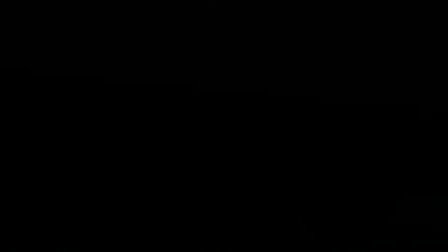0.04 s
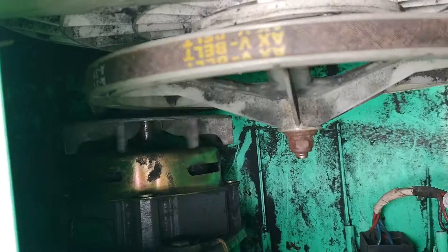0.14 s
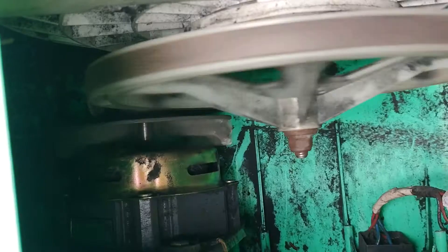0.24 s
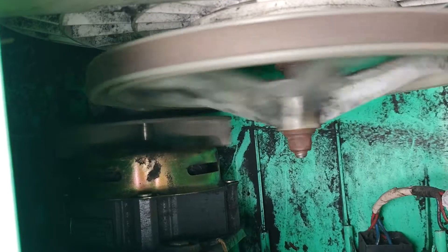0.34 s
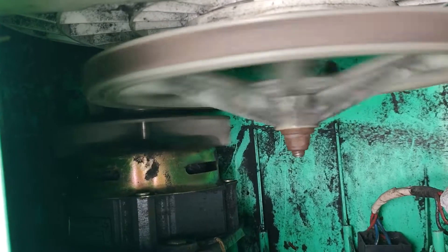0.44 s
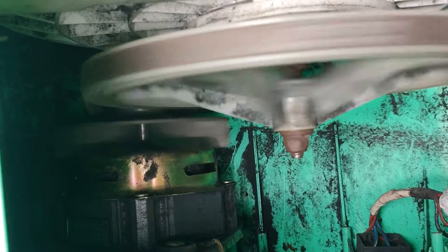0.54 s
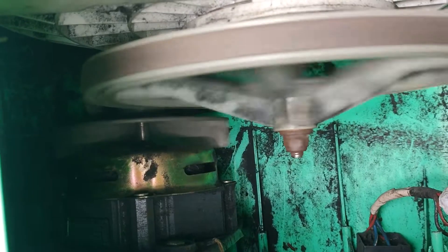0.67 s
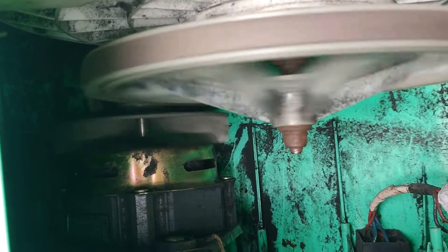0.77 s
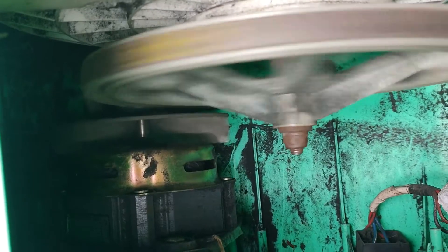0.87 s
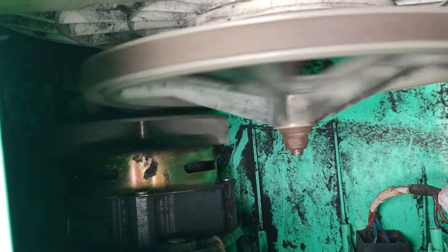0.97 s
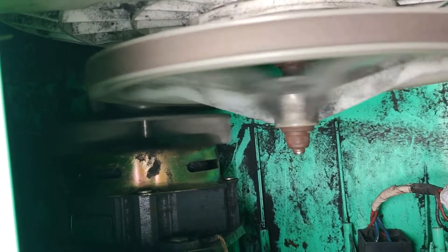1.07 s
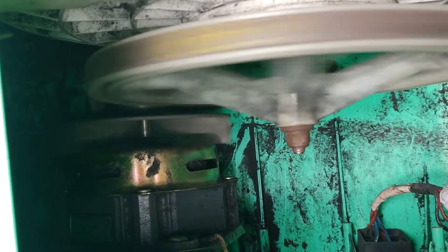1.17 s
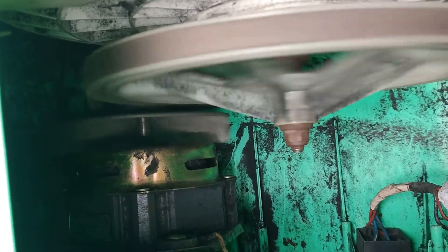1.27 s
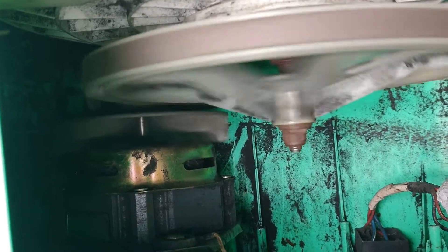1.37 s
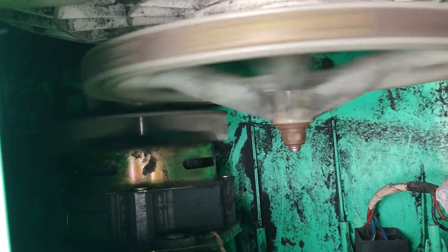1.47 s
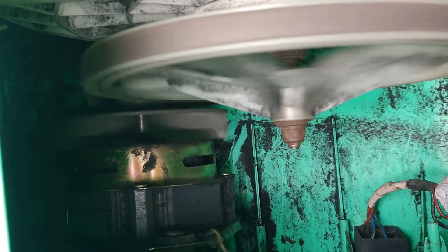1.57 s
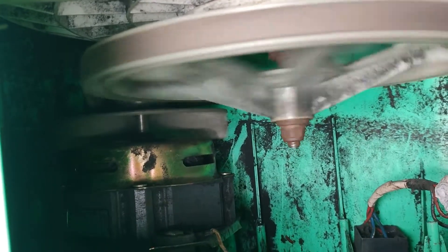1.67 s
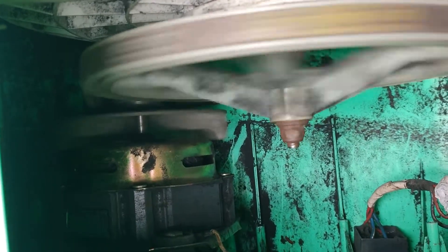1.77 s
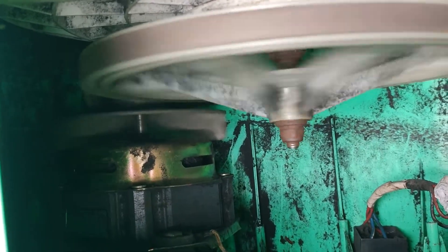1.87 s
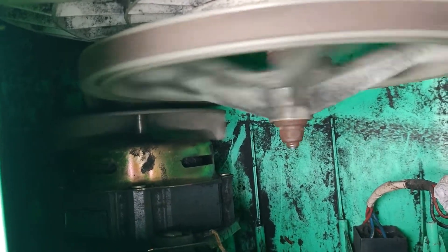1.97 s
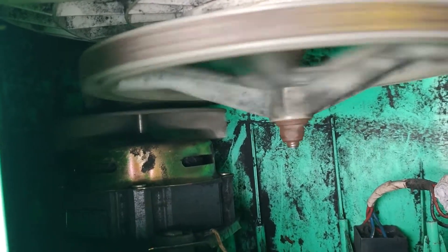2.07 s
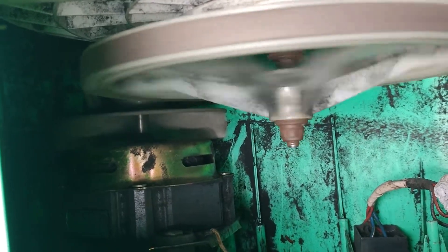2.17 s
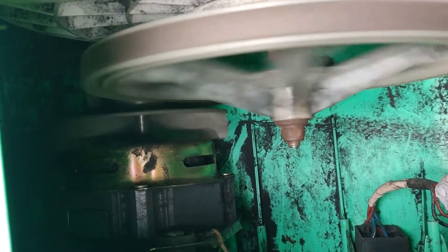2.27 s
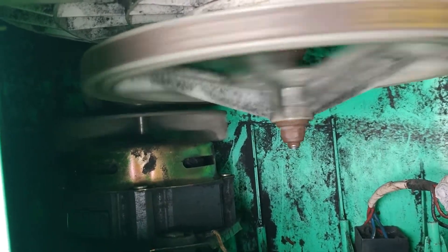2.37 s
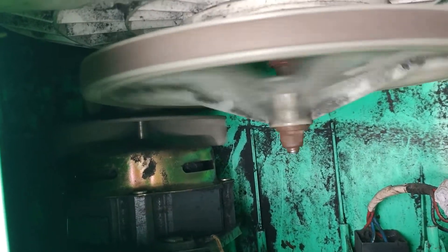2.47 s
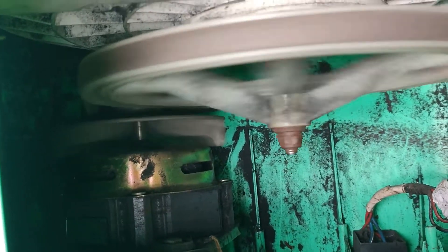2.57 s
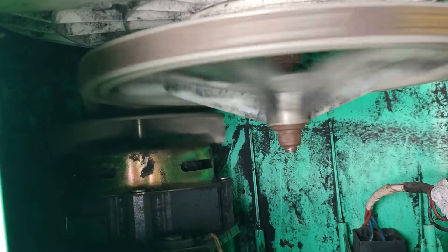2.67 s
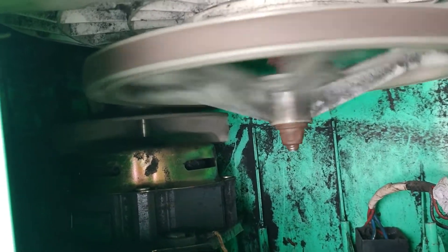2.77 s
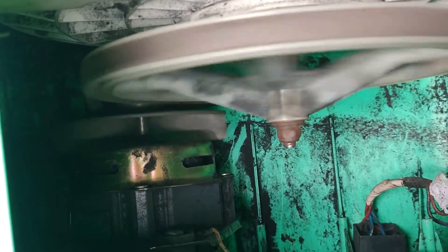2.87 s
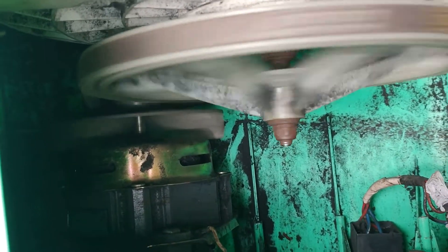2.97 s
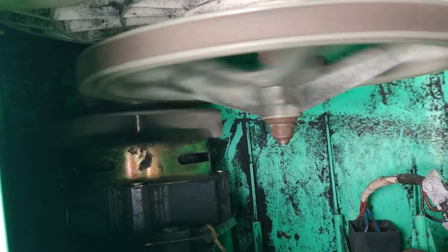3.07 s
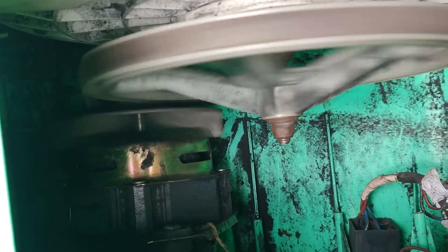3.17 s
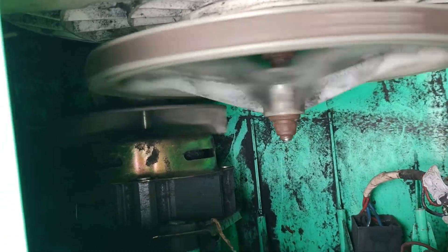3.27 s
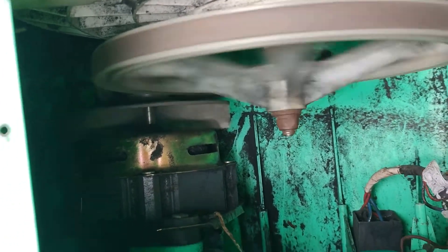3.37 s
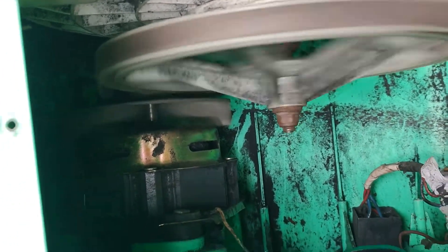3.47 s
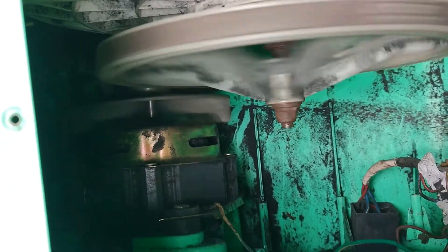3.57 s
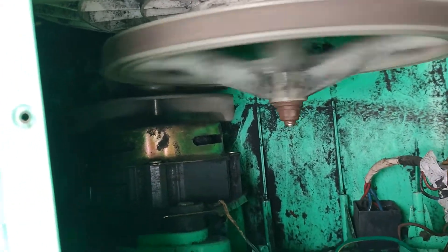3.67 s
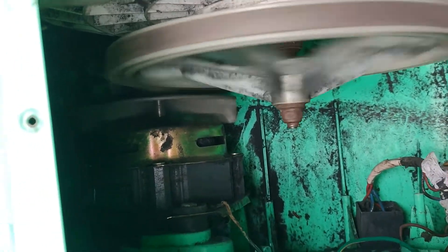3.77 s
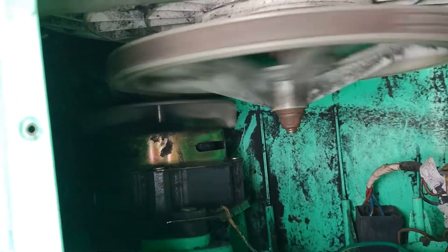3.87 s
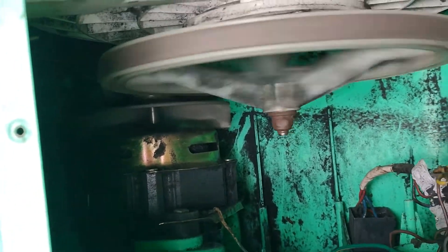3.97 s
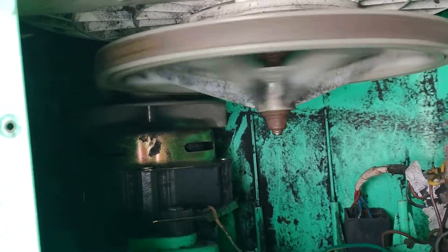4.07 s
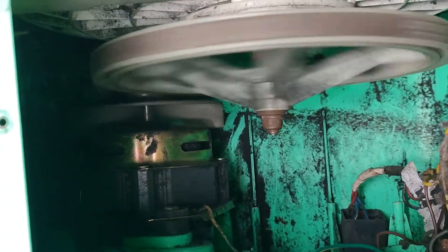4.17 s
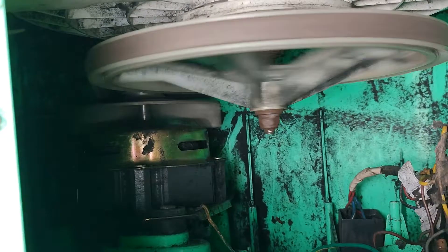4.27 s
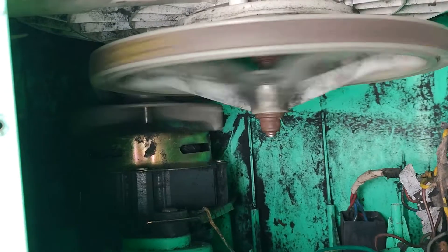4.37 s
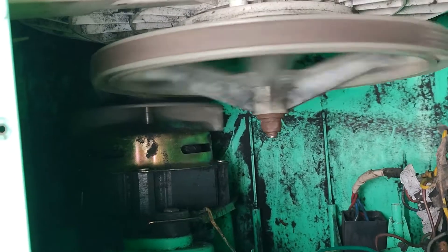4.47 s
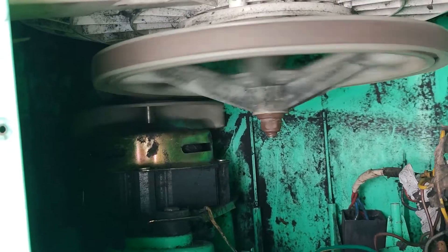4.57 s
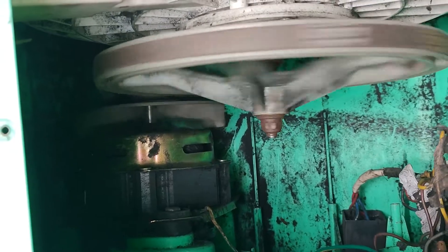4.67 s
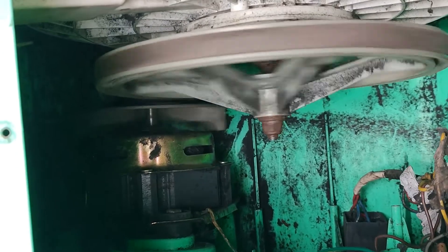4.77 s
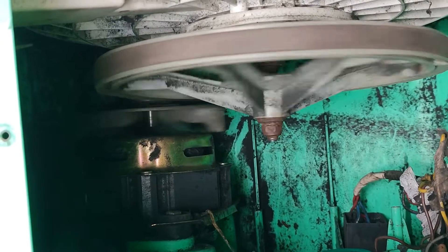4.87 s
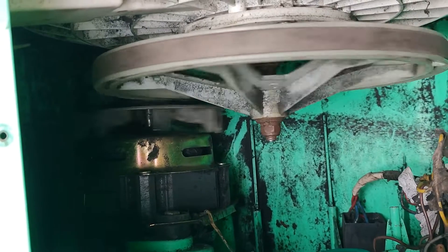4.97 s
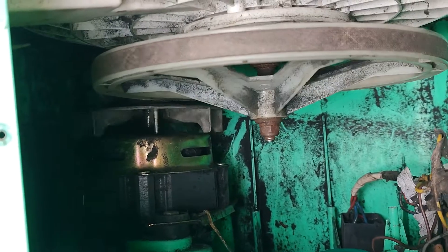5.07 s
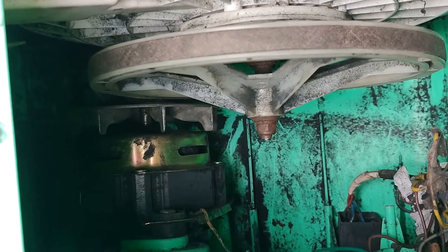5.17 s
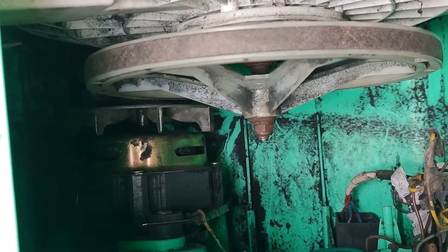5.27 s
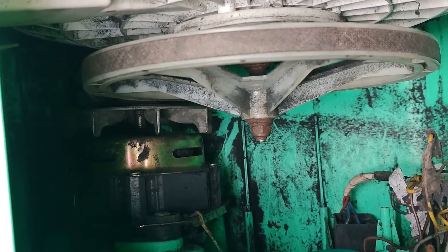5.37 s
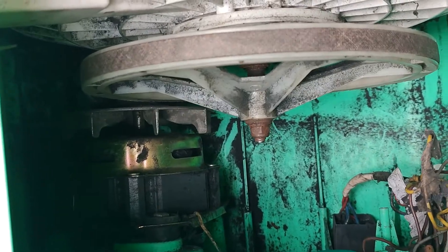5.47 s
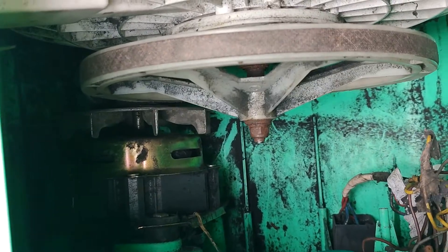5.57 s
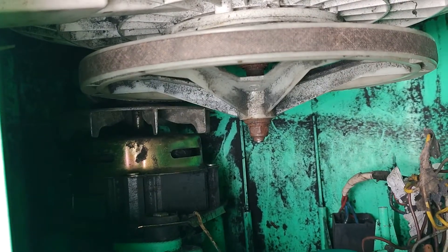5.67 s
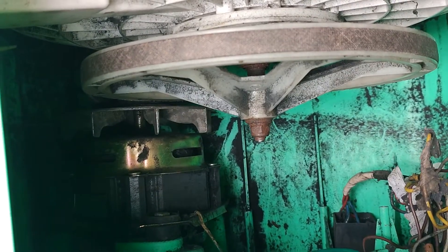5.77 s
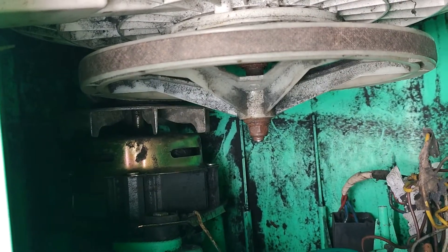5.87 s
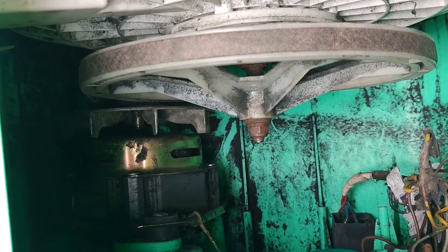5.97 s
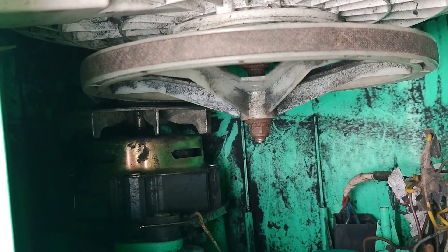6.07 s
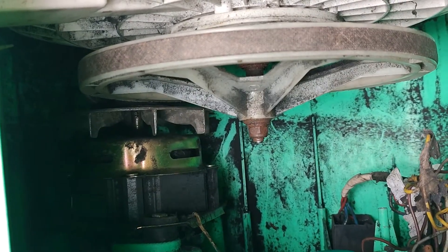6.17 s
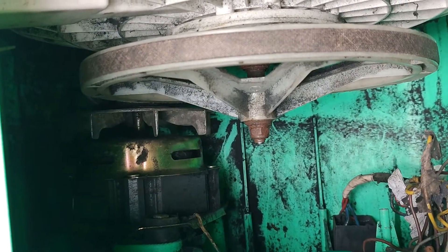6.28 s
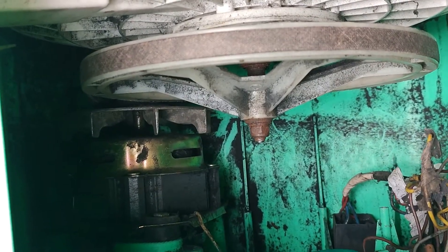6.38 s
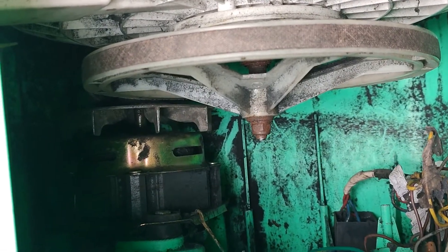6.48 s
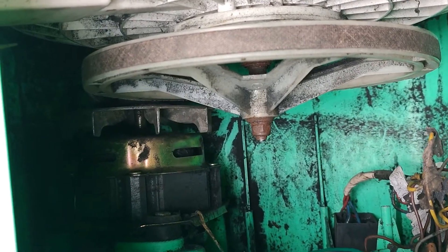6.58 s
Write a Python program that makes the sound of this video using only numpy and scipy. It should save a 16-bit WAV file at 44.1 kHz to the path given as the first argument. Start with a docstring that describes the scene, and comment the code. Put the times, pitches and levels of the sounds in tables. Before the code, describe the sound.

A washing machine motor clunks on, hums with a slapping belt and coasts to a stop, then a one-cylinder engine putters closer outside.

```python
"""A repair shop open to the street, inside the steel cabinet of a washing machine.
The induction motor starts with a clunk, hums and drives the big pulley through a slapping, rubbing V-belt.
The cabinet booms and loose parts chatter until the motor is switched off and coasts to rest.
Outside, one vehicle swishes past on its tyres; then a one-cylinder engine putters near, gears whining."""
import sys
import numpy as np
from scipy import signal
from scipy.fft import rfft, irfft
from scipy.io import wavfile

SR = 44100
rng = np.random.default_rng(int(sys.argv[2]) if len(sys.argv) > 2 else 0)


def unload_wav(signal):
    """Save mono or channel-first audio to the path in sys.argv[1] as 16-bit WAV at rate SR, clipped to [-1, 1]."""
    wavfile.write(
        sys.argv[1],
        SR,
        np.round(np.clip(np.atleast_2d(signal).T, -1, 1) * 32767).astype(np.int16),
    )


N = 292383
T = np.arange(N) / SR

ON_S, CUT_S, COAST_S, STOP_S = .237, 4.615, 4.635, 5.008
SLIP_S, TAKE_UP_S = .388, .12
ROTOR_HZ, PULLEY_HZ, BELT_HZ, MAINS_HZ, RIM_HZ = 28.43, 6.59, 4.48, 60.15, 1499
LABOUR_PEAK_S, CLATTER_PEAK_S, RUB_PEAK_S = 2.435, 2.472, 2.51   # recur each turn: pulley out of true
FLAP_PEAK_S, LURCH_HALF_S, TAPS_PER_S = 2.494, .025, 110

# Noise spectra. Each row: frequency in Hz, relative density in dB.
SHOP_SPECTRUM = [(42, 2), (150, 2), (330, -8.5), (740, -11), (875, -4), (1000, -11), (1500, -19),
                 (2500, -19), (6000, -36.5)]
ROAD_SPECTRUM = [(400, -12), (600, -8), (741, -12.5), (861, 1), (1050, -11), (1350, -5), (4110, -16),
                 (8570, -20.5), (9520, -28.5), (14500, -27)]
CRACK_SPECTRUM = [(100, -9), (400, 0), (723, -13), (1100, -5), (1260, -21), (1770, -24), (2180, -10.5),
                  (3400, -25), (5000, -30), (7200, -19), (10400, -39), (13500, -28)]
BOOM_SPECTRUM = [(35, -19), (41, -7), (65, -5.5), (90, -3.5), (125, 0.5), (170, 0), (208, -0.5),
                 (260, -15.5), (400, -31), (900, -41)]
PANEL_SPECTRUM = [(150, -13), (280, 2), (340, 1), (410, -4), (500, 0), (575, 3), (680, -14), (850, -10),
                  (1100, -16), (2500, -30)]
RUB_SPECTRUM = [(700, 7), (1500, 0), (2400, 1), (3800, -0.5), (6000, 1), (7400, 3.5), (8300, -6.5),
                (9700, -13.5), (12000, -7.5), (14500, -7.5)]
SLAP_SPECTRUM = [(250, -7), (550, 14), (850, -3), (1500, -18), (3000, -13), (8000, -27)]
SLIP_SPECTRUM = [(300, -14), (590, 4), (720, -9), (900, -7), (2600, -32)]
BEARING_SPECTRUM = [(500, 14), (800, -2), (1100, 3.5), (1350, -0.5), (2100, 3.5), (3000, -10.5),
                    (6000, -14.5), (14000, -27)]
ROAR_SPECTRUM = [(950, 0), (1450, -1), (2800, -16)]
TYRE_SPECTRUM = [(600, -6), (1150, -4.5), (1350, -10), (3670, -16.5), (7250, -20.5), (9470, -30),
                 (14500, -32)]
TICK_SPECTRUM = [(1500, 0), (5500, -2), (6800, 4), (8500, -9), (14000, -3)]
GAS_SPECTRUM = [(50, -12), (110, -3), (200, -1), (300, -5.5), (600, -19), (1200, -28)]
# Stereo width. Each row: frequency in Hz, left-right correlation.
CORRELATION = [(100, 0.99), (170, 0.97), (260, 0.73), (550, 0.96), (1000, 0.23), (2500, 0.066), (14000, 0)]
# Stereo balance. Each row: frequency in Hz, left minus right in dB.
BALANCE = [(100, -2.5), (600, 1), (1200, -2), (2500, -4), (4500, -4.5), (7300, -6.5), (8600, 6.5),
           (10000, -2), (13000, 3)]

# Drive knocks. Each row: start in seconds, level in dB, T60 in seconds.
KNOCKS = [(.237, -17, .025), (.2398, -13, .05), (.253, -24, .17), (.287, -33, .08), (.303, -32, .1),
          (.321, -30, .05), (1.267, -26, .06), (1.372, -27, .034), (1.724, -25, .05), (4.824, -37, .25)]
# Steel frame. Each row: frequency in Hz, relative level in dB, T60 in seconds.
FRAME_MODES = [(361, -9, .16), (535, -5.5, .17), (844, -11, .15), (1503, -11, .25), (2150, -4, .12),
               (2410, -13, .19), (2676, -14, .08), (4020, -18, .055), (7000, -11, .055), (13000, -21, .12)]
# Resonances. Each row: frequency in Hz, width in Hz, relative level in dB.
CABINET_MODES = [(2560, 200, -57), (3262, 90, -65)]
LOOSE_PART_MODES = [(840, 40, -45), (1100, 70, -48), (1360, 40, -52), (2020, 130, -52), (2360, 110, -55)]
CASING_MODES = [(895, 50, -4.5), (1300, 90, -12), (1660, 55, -10), (3245, 50, -6), (3760, 100, -12)]
# Rotor run. Each row: time in seconds, fraction of full speed.
ROTOR_SPEED = [(0, 0), (.24, 0), (.35, .5), (.44, 1), (4.63, 1), (4.8, .6), (5.08, 0)]
# Unbalance and pulley runout. Each row: multiple of the rotor rate, level in dB.
ROTOR_ORDERS = [(1, -51), (2, -29.5), (5, -34), (6, -28), (7, -39), (12, -43), (17, -49)]
# Magnetic hum. Each row: multiple of the mains rate, level in dB.
HUM_HARMONICS = [(1, -39), (2, -20), (4, -43.5), (8, -46.5)]
# Brief swells and dips. Each row: centre in seconds, change in dB.
BELT_LURCHES = [(.93, 3), (1.215, -8), (1.39, 3), (1.995, -7), (2.145, 2.5), (3.325, -8), (3.72, 3),
                (3.905, -9), (4.275, 3), (4.615, 2), (4.695, -5), (4.855, 5)]   # snatches (+), goes slack (-)
BELT_SCRAPES = [(.49, 2), (1.157, 4), (1.228, -5), (1.32, 3), (1.548, 3.5), (1.862, 3), (2.342, 3),
                (2.443, -5)]   # scrapes harder (+), lifts in its groove (-)
THIRD_ORDER_SURGES = [(1.11, 4), (1.8, -5), (2.06, 7), (2.15, -8), (2.51, 7)]
LOAD_SWINGS = [(.48, -3), (.79, 2), (1.22, 3), (2.6, 4), (2.67, -5), (3.13, -6)]
# Belt rubbing. Each row: time in seconds, level in dB.
RUB_LEVEL = [(.36, -46), (.48, -41), (1.8, -40.6), (3.3, -41), (4.6, -42)]
# Belt events. Each row: time in seconds, relative level in dB.
SLAPS = [(0.388, -12), (0.486, -15), (0.509, -14), (0.951, -14), (1.371, -14), (2.63, -13), (3.553, -11),
         (4.292, -14), (4.618, -13), (5.02, -29)]
SQUEAKS = [(.73, -47), (1.225, -44), (1.8, -48), (2.22, -49), (2.605, -42)]
# Clinks of loose parts. Each row: start in seconds, frequency in Hz, level in dB.
CLINKS = [(3.08, 2450, -33), (3.225, 1150, -25), (3.275, 1150, -27), (3.378, 1050, -26), (3.403, 2750, -29),
          (4.069, 2020, -35)]

# Engine speed. Each row: time in seconds, firings per second.
FIRING_RATE = [(5.04, 35.5), (5.19, 38.2), (5.55, 38.85), (5.9, 39.1), (6.2, 39.4), (6.43, 40.15),
               (6.63, 39.6)]
# Exhaust. Each row: multiple of the firing rate, relative level in dB when far, then when near.
EXHAUST_HARMONICS = [(2, 2, 2), (4, -4, 0), (5, 2, -1.5), (7, -14, -5), (8, -6.5, -16), (9, -9.5, -13),
                     (10, -11, -17), (12, -10.5, -18)]
# Booming third exhaust harmonic. Each row: time in seconds, level in dB.
EXHAUST_BOOM = [(5.066, -44), (5.26, -35), (5.77, -35), (5.916, -55), (6.048, -32), (6.4, -28), (6.63, -34)]
# Gears. Each row: peak in seconds, half length in seconds, multiple of the firing rate, level in dB.
GEAR_WHINES = [(6.3, .11, 22, -40), (6.3, .1, 23, -45), (6.6, .06, 23, -42), (6.43, .13, 34, -41),
               (6.4, .17, 32, -45), (6.61, .08, 32, -36)]
# High engine whines. Each row: peak in seconds, half length in seconds, frequency in Hz, level in dB.
HIGH_ENGINE_WHINES = [(6.29, .06, 2705, -43), (6.53, .09, 2186, -43), (6.53, .1, 5490, -51)]


def from_db(db):
    """Decibels to gain."""
    return np.exp(np.maximum(db, -300) * (np.log(10) / 20))


def unit_rms(x):
    """Scale to rms 1."""
    return x / np.sqrt(np.mean(x ** 2) + 1e-20)


def curve(rows):
    """Interpolate rows at every sample."""
    return np.interp(T, *np.transpose(rows))


def at_hz(rows, hz):
    """Interpolate rows over log frequency."""
    row_hz, value = np.transpose(rows)
    return np.interp(np.log(hz + 1e-3), np.log(row_hz), value)


def drift(rate_hz):
    """Random wander through unit-variance knots."""
    knots = rng.standard_normal(int(rate_hz * N / SR) + 2)
    return np.interp(T * rate_hz, np.arange(len(knots)), knots)


def radiate(pair, spectrum, ripple_db=4.0):
    """Colour two signals and spread them as mid and side; rms 1."""
    hz = np.fft.rfftfreq(N, 1 / SR)
    skirt = np.minimum(hz / spectrum[0][0], 1) ** 3 * np.minimum(spectrum[-1][0] / (hz + 1), 1) ** 2
    mid, side = rfft(pair) * from_db(at_hz(spectrum, hz)) * skirt
    alike = np.clip(at_hz(CORRELATION, hz), -1, 1)
    sign = np.array([[1], [-1]])
    stereo = np.sqrt(1 + alike) * mid + sign * np.sqrt(1 - alike) * side
    # cabinet standing waves ripple the treble, differently per channel
    modes_hz = np.arange(0, SR / 2, 28)
    ripple = np.array([np.interp(hz, modes_hz, row) for row in rng.standard_normal((2, len(modes_hz)))])
    ripple = ripple * ripple_db * np.minimum(hz / 1200, 1) ** 2
    return unit_rms(irfft(stereo * from_db(sign * at_hz(BALANCE, hz) / 2 + ripple), N))


def noise(spectrum, ripple_db=2.3):
    """Coloured stereo noise; rms 1."""
    return radiate(rng.standard_normal((2, N)), spectrum, ripple_db)


def resonate(x, hz, width_hz):
    """One resonance; rms 1."""
    r = np.exp(-np.pi * width_hz / SR)
    return unit_rms(signal.lfilter([1, 0, -1], [1, -2 * r * np.cos(2 * np.pi * hz / SR), r * r], x))


def noise_band(hz, width_hz):
    """Narrow stereo noise; rms 1."""
    return resonate(rng.standard_normal((2, N)), hz, width_hz)


def tone(turns):
    """Sine with random start phase; rms 1."""
    return np.sqrt(2) * np.sin(2 * np.pi * (turns + rng.random()))


def throb(turns, depth_db):
    """Gain that swells once a turn."""
    return unit_rms(from_db(depth_db * np.cos(2 * np.pi * turns)))


def turns_since(s, hz, run_s):
    """Turns of a driven part since time s."""
    return hz * (run_s - np.interp(s, T, run_s))


def decay(start_s, t60_s):
    """Fast attack, exponential decay."""
    age_s = np.maximum(T - start_s, 0)
    return np.minimum(age_s / .0005, 1) * from_db(-60 * age_s / t60_s)


def bump(peak_s, half_s):
    """Gaussian envelope."""
    return np.exp(-np.minimum(((T - peak_s) / half_s) ** 2, 30))


def swings(rows, half_s):
    """Gain with brief rises and dips."""
    return from_db(sum(db * bump(s, half_s) for s, db in rows))


def swell(rows):
    """Gain of a dB curve, fading outside its span."""
    outside_s = np.maximum(rows[0][0] - T, 0) + np.maximum(T - rows[-1][0], 0)
    return from_db(curve(rows)) * np.exp(-outside_s / .09)


def take_up(speed, power):
    """Gain that follows speed, ramping in as the belt grips."""
    return speed ** power * np.clip((T - SLIP_S) / TAKE_UP_S, 0, 1)


def passing(nearest_s, peak_db, half_s, before_db_per_s=1.2, after_db_per_s=1.2):
    """Pass-by gain: one over distance, screened by walls on either side."""
    before_db = before_db_per_s * np.maximum(nearest_s - T, 0)
    after_db = after_db_per_s * np.maximum(T - nearest_s, 0)
    return from_db(peak_db - before_db - after_db) / np.hypot(1, (T - nearest_s) / half_s)


def shop_murmur():
    """Steady room background."""
    return from_db(-42.5) * noise(SHOP_SPECTRUM)


def traffic():
    """Far traffic wash; tyre noise swells near the end."""
    level = np.hypot(from_db(-58), passing(nearest_s=6.56, peak_db=-33, half_s=.29))
    return level * from_db(1.2 * drift(40)) * noise(ROAD_SPECTRUM, ripple_db=2.2)


def drive_knocks():
    """Starting torque jerks the drive and rings the frame; lighter knocks and a tick follow."""
    cracks = noise(CRACK_SPECTRUM) * sum(from_db(db) * decay(s, t60_s) for s, db, t60_s in KNOCKS)
    frame = sum(from_db(db) * tone(hz * T) * decay(ON_S, t60_s) for hz, db, t60_s in FRAME_MODES)
    tick = from_db(-41.5) * noise(TICK_SPECTRUM) * decay(5.236, t60_s=.22)
    return cracks + from_db(-21) * frame * from_db([[-1.0], [1.0]]) + tick


def cabinet_ring():
    """Faint steel resonances, from switch-on."""
    ring = sum(from_db(db) * noise_band(hz, width_hz) for hz, width_hz, db in CABINET_MODES)
    return ring * from_db(2.5 * drift(18) - .5) * (T > ON_S)


def motor(speed, run_s):
    """Rotor orders follow speed; magnetic hum lasts while current flows and swells each pulley turn."""
    turns = ROTOR_HZ * run_s + .018 * drift(6)
    orders = sum(from_db(db + 2.6 * drift(9)) * tone(k * turns + .03 * drift(12))
                 for k, db in ROTOR_ORDERS)
    orders *= swings(BELT_LURCHES, LURCH_HALF_S)
    orders += from_db(-25 + 1.2 * drift(9)) * tone(3 * turns) * swings(THIRD_ORDER_SURGES, half_s=.055)
    current = np.clip((T - ON_S) / .0062, 0, 1) * np.exp(-np.maximum(T - CUT_S, 0) / .023)
    hum = sum(from_db(db + .9 * drift(5.85)) * tone(k * MAINS_HZ * T) for k, db in HUM_HARMONICS)
    hum *= throb(turns_since(LABOUR_PEAK_S, PULLEY_HZ, run_s), depth_db=1.0)
    hum *= swings(LOAD_SWINGS, half_s=.05)
    sideband = tone(2 * MAINS_HZ * T + 3 * turns)   # uneven air gap
    hum += from_db(-29 + 2.0 * drift(10)) * sideband * speed
    growl = from_db(-33) * tone(6 * MAINS_HZ * T) * (1 - speed) * (T < COAST_S)   # starting current
    return orders * speed ** 4 + (hum * from_db(-9 * (1 - speed)) + growl) * current, turns


def belt_bumps(run_s, spread_db, tremble, count=900):
    """Worn spots strike the pulleys in the same order each lap, over a random tremble."""
    spots = unit_rms(rng.standard_normal((2, count)) * from_db(spread_db * rng.standard_normal(count)))
    place = (BELT_HZ * run_s * count).astype(int)
    striking = np.diff(place, prepend=0) > 0
    return unit_rms(spots[:, place % count] * striking) + tremble * rng.standard_normal((2, N))


def cabinet_shake(speed, run_s, pull):
    """Belt bumps boom in the cabinet and clatter its panels; the drum rocks back as it stops."""
    tension = np.interp(T, [.38, .43], [.3, 1])
    coast = from_db(-22 * np.maximum(T - COAST_S, 0))
    flap = throb(turns_since(FLAP_PEAK_S, 2 * BELT_HZ, run_s), depth_db=1.2)   # free span, twice a lap
    boom = from_db(-21.4) * radiate(belt_bumps(run_s, spread_db=2.3, tremble=.65), BOOM_SPECTRUM)
    boom *= flap * swings(BELT_LURCHES, LURCH_HALF_S) * tension * coast
    rock_back = from_db(-35) * noise(BOOM_SPECTRUM) * decay(STOP_S, t60_s=.3)
    panels = from_db(-31.1) * radiate(belt_bumps(run_s, spread_db=3.0, tremble=.9), PANEL_SPECTRUM)
    panels *= throb(ROTOR_HZ * run_s, depth_db=2.6)
    panels *= throb(turns_since(CLATTER_PEAK_S, PULLEY_HZ, run_s), depth_db=1.9)
    return speed * (boom + panels * pull) + rock_back


def belt_rub(speed, run_s, pull):
    """The belt rubs in its grooves, swelling each pulley turn."""
    grip = throb(turns_since(RUB_PEAK_S, PULLEY_HZ, run_s), depth_db=2.2)
    grip *= throb(3 * ROTOR_HZ * run_s, depth_db=.7)
    grain = from_db(1.7 * drift(170) + .7 * drift(25))
    level = from_db(curve(RUB_LEVEL)) * swings(BELT_SCRAPES, half_s=.014) * pull * speed ** 1.74
    return level * grip * grain * noise(RUB_SPECTRUM)


def belt_squeak(speed):
    """The belt sings on the pulley rim: a faint tone with brief squeaks."""
    level = from_db(-57) * speed + sum(from_db(db) * bump(s, half_s=.035) for s, db in SQUEAKS)
    flicker = from_db(2.5 * drift(110) - 1)
    rim = tone(RIM_HZ * T + .12 * drift(50) + .04 * drift(300))
    return level * flicker * rim * from_db([[-2.5], [2.0]])


def belt_slaps():
    """The belt slips with a rasp before it grips, then slaps now and then."""
    strikes = sum(from_db(db) * decay(s, t60_s=.077) for s, db in SLAPS)
    slaps = from_db(-13) * noise(SLAP_SPECTRUM) * strikes
    rasp = from_db(-29) * noise(SLIP_SPECTRUM) * bump(SLIP_S, half_s=.03)
    return slaps + rasp


def bearings(speed, rotor_turns):
    """Motor bearings chafe twice a turn."""
    chafing = throb(2 * rotor_turns, depth_db=3.5)
    return from_db(-41.5) * noise(BEARING_SPECTRUM) * chafing * take_up(speed, power=5)


def chatter(speed, run_s):
    """Loose parts tap at random, mostly at one point of each rotor turn; a few clinks stand out."""
    chance = TAPS_PER_S / SR * throb(ROTOR_HZ * run_s, depth_db=5.0)
    rattle = 0
    for hz, width_hz, db in LOOSE_PART_MODES:
        sizes = from_db(2.5 * np.minimum(rng.exponential(1, N), 3))
        taps = (rng.random(N) < chance) * sizes * rng.uniform(-1, 1, (2, N))
        rattle += from_db(db) * resonate(taps, hz, width_hz)
    clinks = sum(from_db(db) * noise_band(hz, width_hz=220) * decay(s, t60_s=.06) for s, hz, db in CLINKS)
    return (rattle * take_up(speed, power=3) + clinks) * from_db([[-1.5], [1.0]])


def vehicle_roar():
    """The passing vehicle's roar, ahead of its hiss."""
    return from_db(-42) * bump(2.55, half_s=.8) * from_db(1.5 * drift(45)) * noise(ROAR_SPECTRUM)


def vehicle_tyres(screen_hz=3200):
    """Tyres swish past; walls take off the treble at a distance."""
    level = passing(nearest_s=3.27, peak_db=-28.5, half_s=.29, before_db_per_s=1.5, after_db_per_s=7.5)
    tyres = from_db(drift(60)) * noise(TYRE_SPECTRUM, ripple_db=2.5)
    dull = signal.lfilter(*signal.butter(1, screen_hz, fs=SR), tyres)
    brightness = (level / level.max()) ** .25
    return level * (dull + (tyres - dull) * brightness)


def engine(firings):
    """One cylinder: each firing puffs from the exhaust and raps the casing."""
    level = passing(nearest_s=6.65, peak_db=-24.5, half_s=.26)
    nearness = np.interp(T, [5.6, 6.3], [0, 1])
    puffs = sum(from_db(far_db + (near_db - far_db) * nearness + 1.5 * drift(7)) * tone(k * firings)
                for k, far_db, near_db in EXHAUST_HARMONICS)
    thud = from_db(-3) * (level / level.max()) ** .6 * np.cos(2 * np.pi * firings)   # carries only nearby
    boom = swell(EXHAUST_BOOM) * np.sqrt(2) * np.cos(6 * np.pi * firings)
    gas = from_db(-12) * noise(GAS_SPECTRUM)
    raps = unit_rms(np.diff(np.floor(firings), prepend=0))
    raps_and_gas = raps + .45 * rng.standard_normal((2, N))
    casing = sum(from_db(db) * resonate(raps_and_gas, hz, width_hz) for hz, width_hz, db in CASING_MODES)
    return level * (from_db(-6.5) * puffs + thud + gas + from_db(-18.5) * casing) + boom


def thin_hiss():
    """A narrow high hiss swells and fades in the street."""
    return from_db(-56) * bump(5.88, half_s=.36) * noise_band(hz=8520, width_hz=200)


def gear_whine(firings, waver_cycles=.0014):
    """Wavering gear tones track engine speed, by a different path to each channel."""
    whine = np.zeros((2, N))
    for s, half_s, multiple, db in GEAR_WHINES:
        waver = waver_cycles * multiple
        cycles = multiple * firings + waver * drift(120)
        paths = np.array([cycles, cycles + .2 + waver * drift(40)])
        whine += from_db(db) * bump(s, half_s) * np.sqrt(2) * np.sin(2 * np.pi * paths)
    return whine


def high_engine_whine():
    """Brief high whines as the engine comes near."""
    whine = np.zeros((2, N))
    for s, half_s, hz, db in HIGH_ENGINE_WHINES:
        pair = np.array([tone(hz * T + .1 * drift(50)) for _ in range(2)])
        whine += from_db(db) * bump(s, half_s) * pair
    return whine


def scene():
    """Machine close by; street and room behind."""
    speed = curve(ROTOR_SPEED)
    run_s = np.cumsum(speed) / SR   # travel, in seconds at full speed
    pull = np.interp(T, [COAST_S, 4.68], [1, .6])   # belt pull eases without drive
    motor_sound, rotor_turns = motor(speed, run_s)
    machine = motor_sound + bearings(speed, rotor_turns) + cabinet_shake(speed, run_s, pull)
    machine += belt_rub(speed, run_s, pull) + belt_squeak(speed) + belt_slaps()
    machine += chatter(speed, run_s) + drive_knocks()
    street = traffic() + vehicle_tyres() + thin_hiss() + vehicle_roar()
    firings = np.cumsum(curve(FIRING_RATE)) / SR + .001 * drift(30)
    street += engine(firings) + gear_whine(firings) + high_engine_whine()
    return machine + street + cabinet_ring() + shop_murmur()


def record(dry):
    """Brief silence, fast fade-in, steep low-pass."""
    open_s, cutoff_hz = .074, 14350
    opened = dry * np.clip((T - open_s) / .002, 0, 1)
    return signal.sosfilt(signal.ellip(12, .1, 80, cutoff_hz, fs=SR, output="sos"), opened)


dry = scene()
out = record(dry)
unload_wav(out)
```